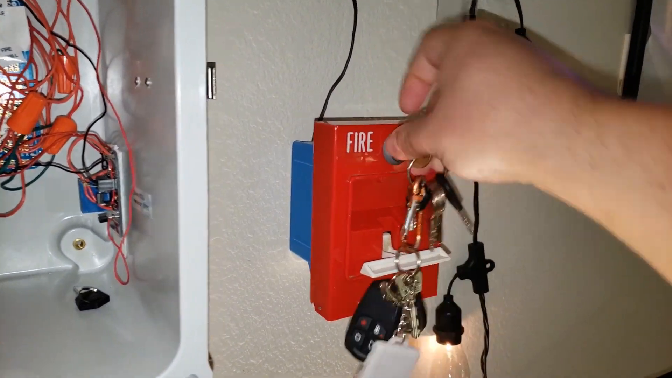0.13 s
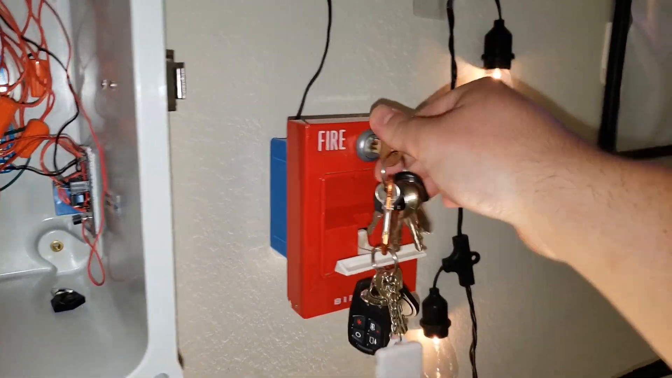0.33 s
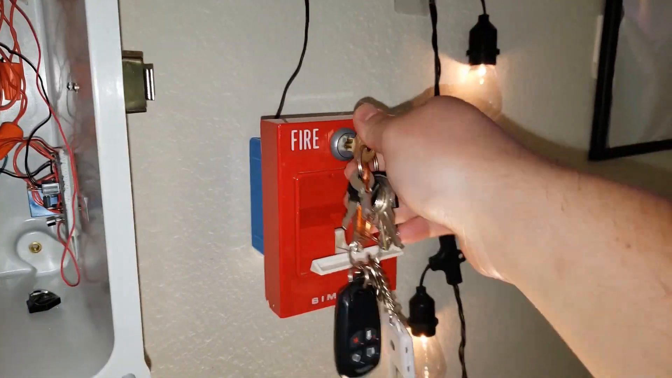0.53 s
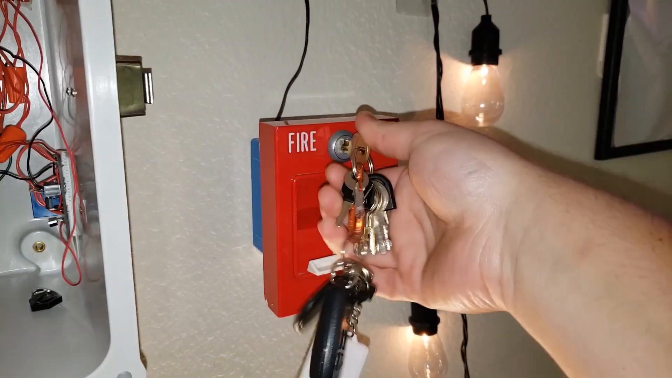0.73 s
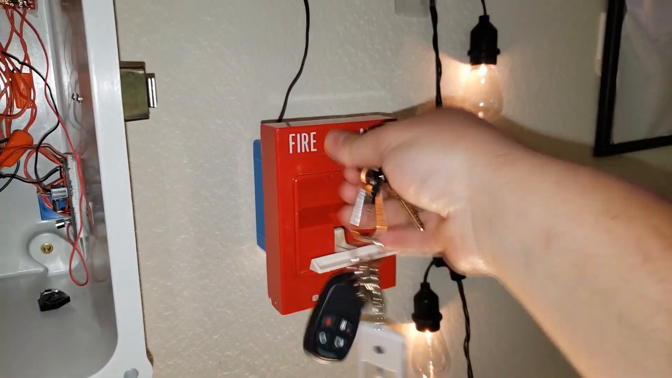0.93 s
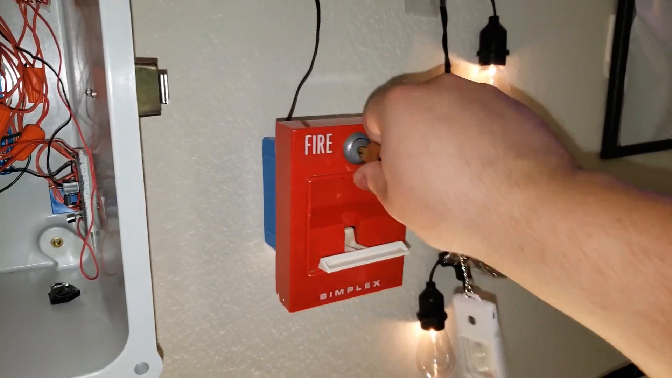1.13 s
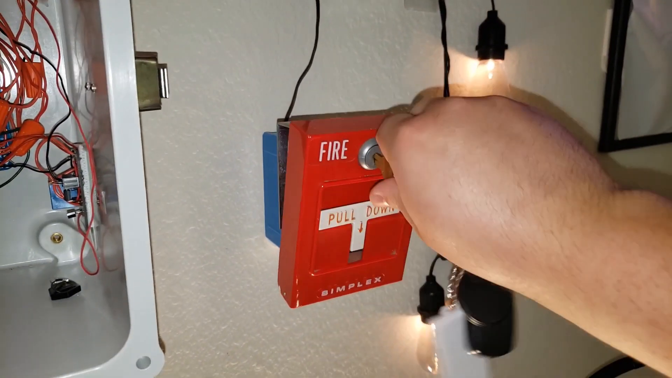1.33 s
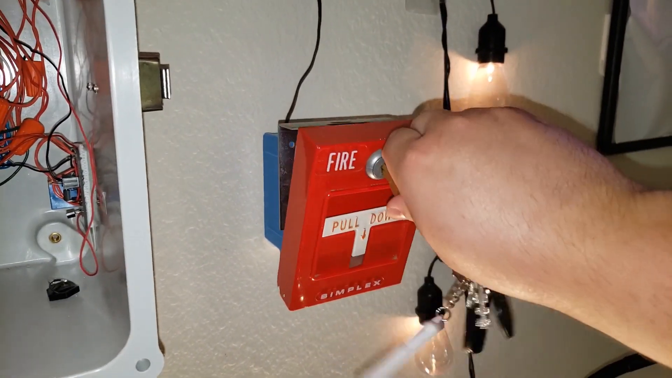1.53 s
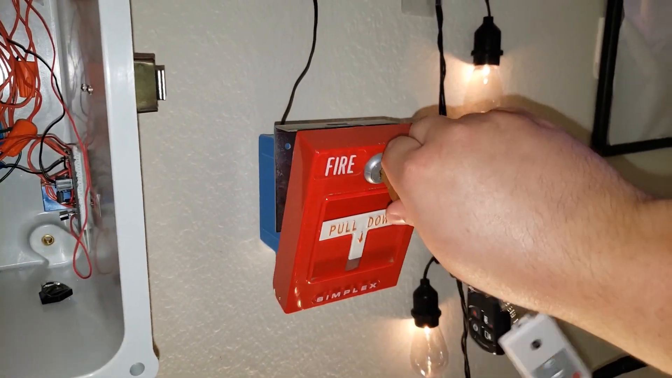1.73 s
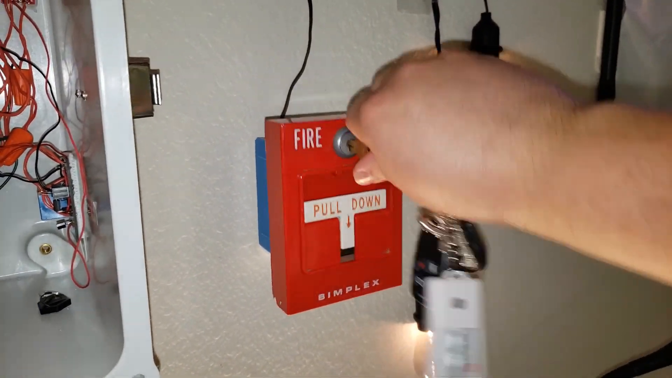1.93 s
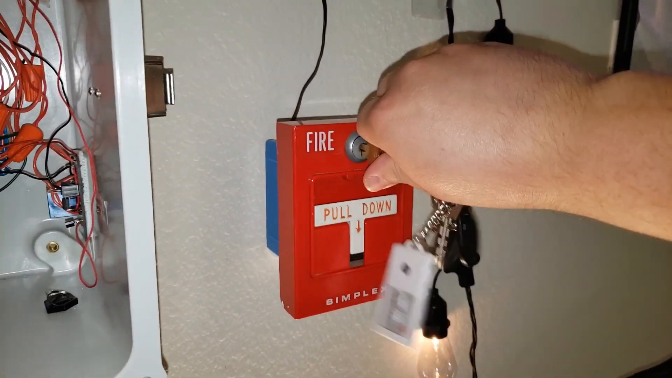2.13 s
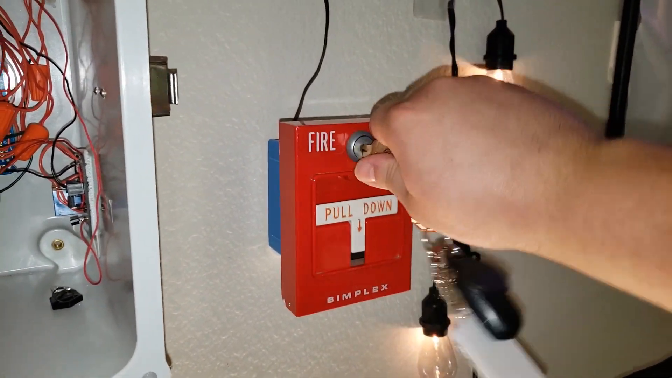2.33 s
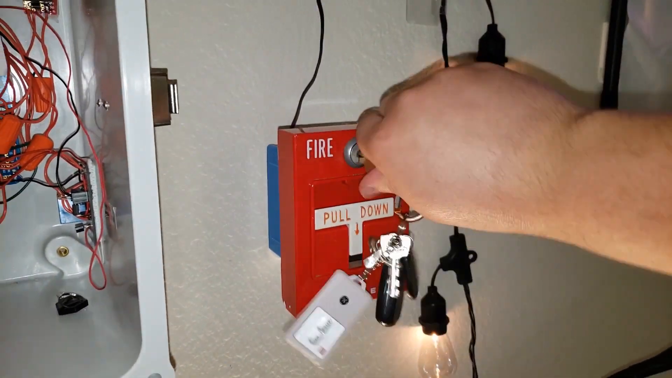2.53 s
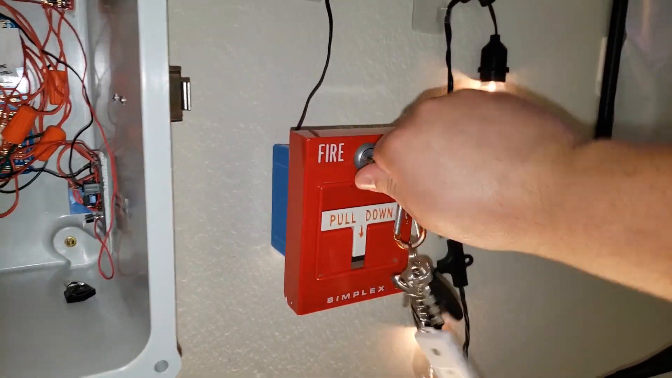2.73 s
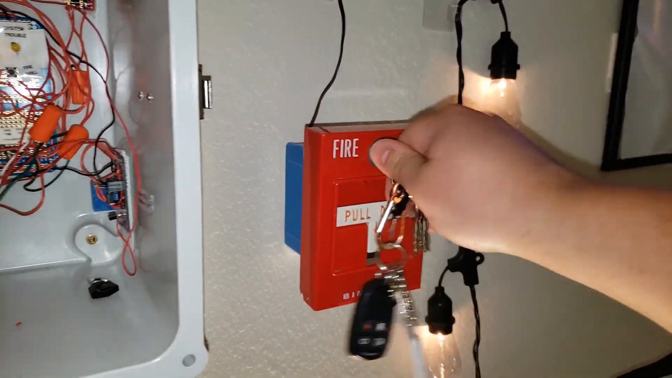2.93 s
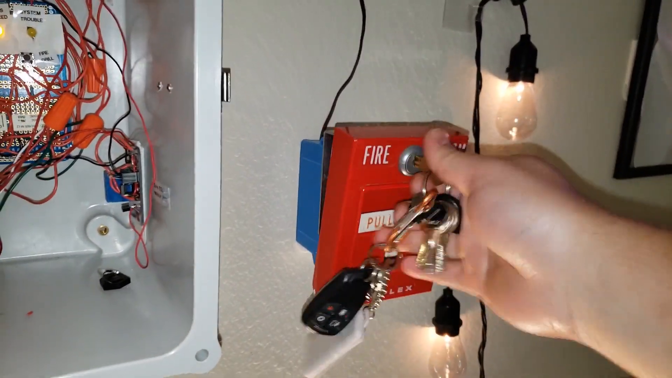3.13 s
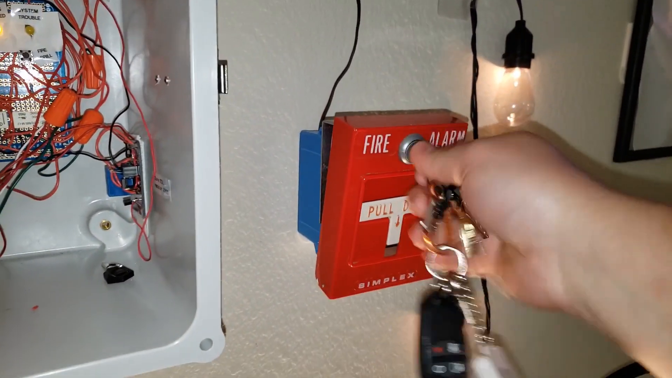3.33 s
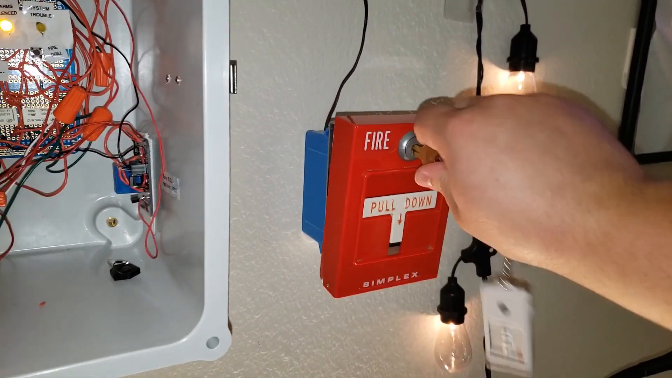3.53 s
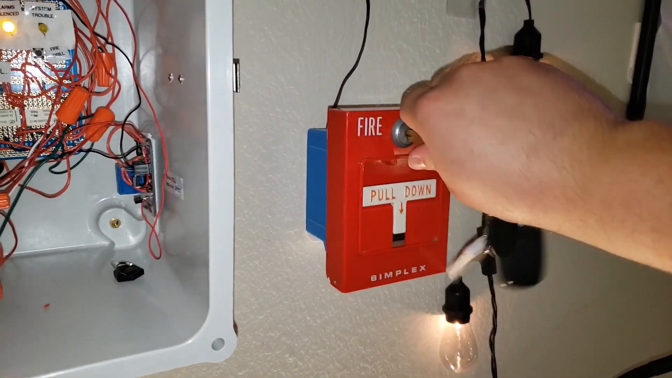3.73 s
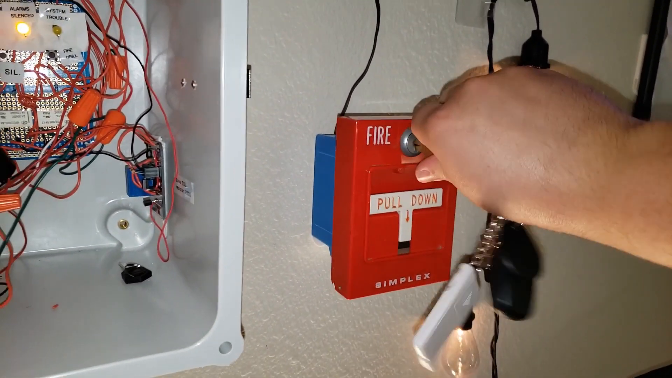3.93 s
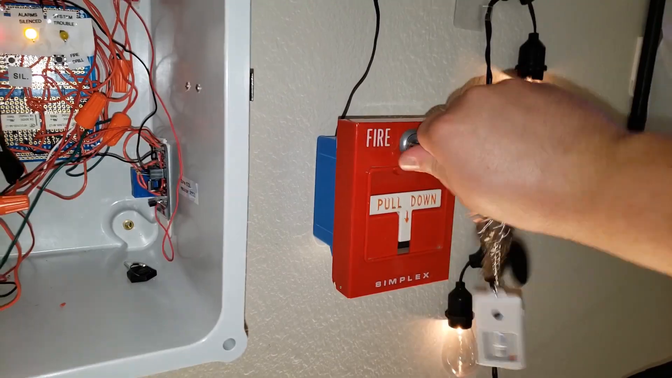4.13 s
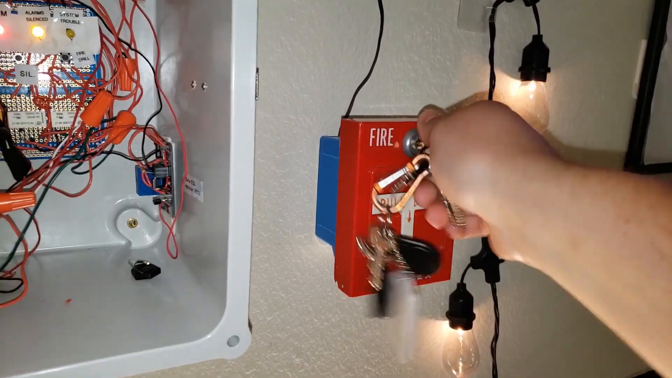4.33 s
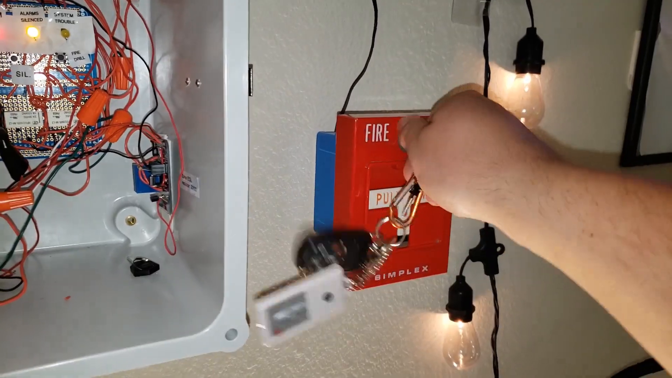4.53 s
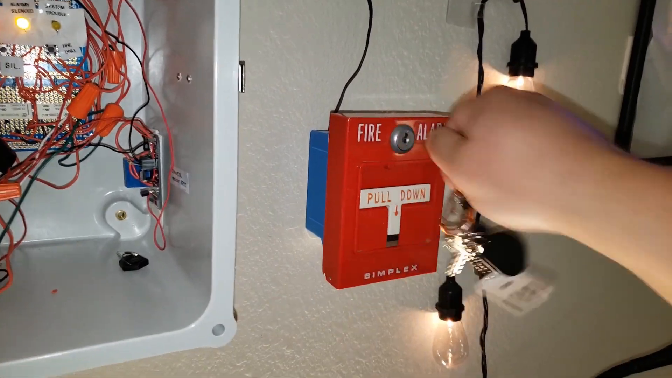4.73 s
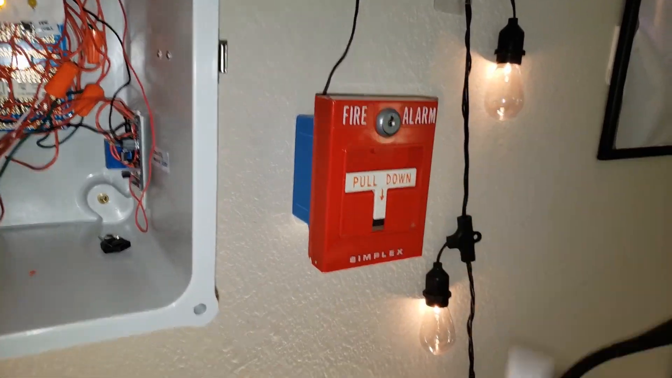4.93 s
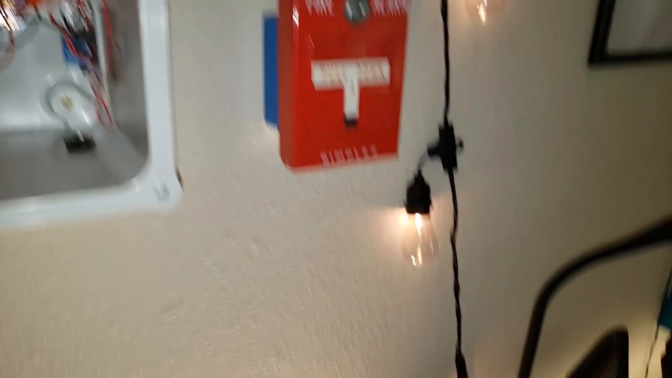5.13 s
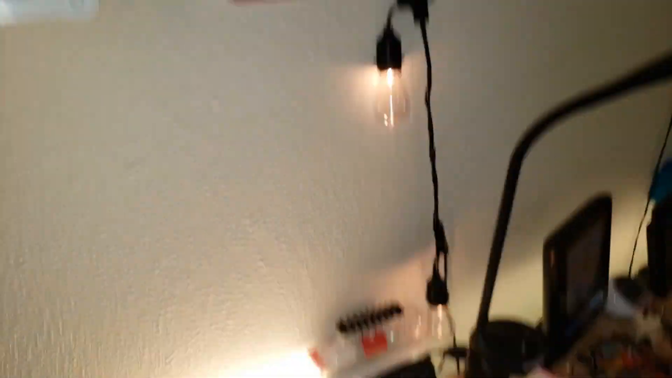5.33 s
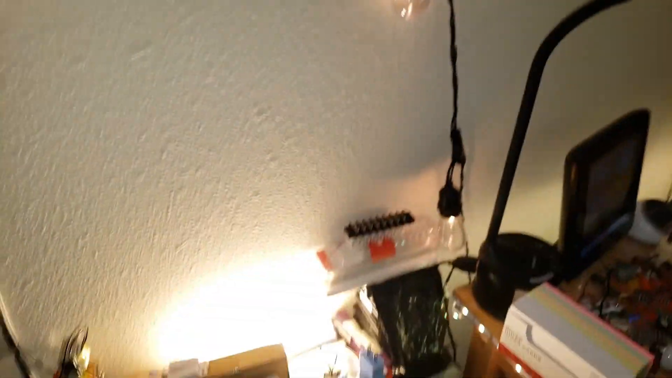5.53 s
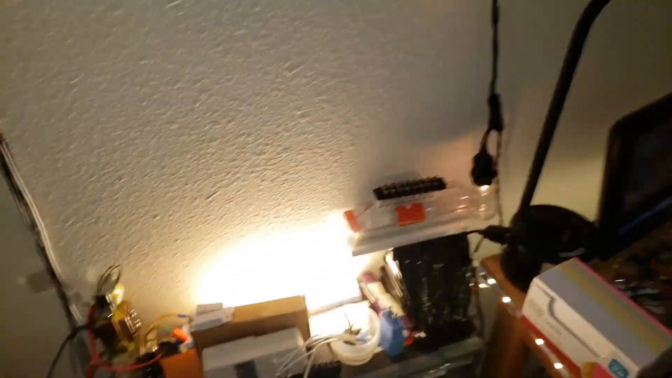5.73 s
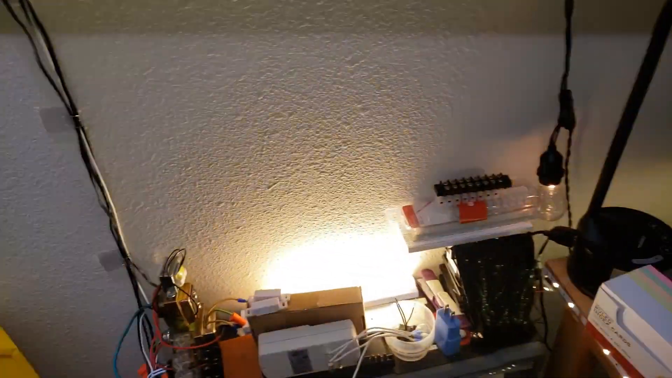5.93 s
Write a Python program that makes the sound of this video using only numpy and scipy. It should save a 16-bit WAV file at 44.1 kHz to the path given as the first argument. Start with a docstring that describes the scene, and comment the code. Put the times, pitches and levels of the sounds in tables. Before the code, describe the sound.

Keys jingle and knock against a hollow metal wall box as a lock turns and a lever snaps, then the bunch clatters onto a desk.

```python
"""A small room with a faint rumble; a bunch of keys hangs from the lock of a hollow wall box.
The key turns, the lever snaps up, the lid knocks, keys clink and a few ring on; at the end the bunch drops on a desk.
Each contact is a short burst of noise that makes casing, lock, keys, wall and box or desk ring.
Sliding noise, decaying tones, low rumble and a noise room tail complete it, heard through two microphones."""
import sys
import numpy as np
from scipy import signal
from scipy.fft import rfft, irfft, next_fast_len
from scipy.io import wavfile
from scipy.ndimage import uniform_filter1d

SR = 44100
rng = np.random.default_rng(int(sys.argv[2]) if len(sys.argv) > 2 else 0)


def transcribe(u):
    """Save the signal u as a 16-bit wav file named by the first command-line argument.

    u: samples, shape (n,) or (channels, n), limited to [-1, 1]; the rate is SR.
    q: integer samples, one column per channel.
    """
    v = np.clip(np.atleast_2d(u).T, -1, 1)
    q = np.round(v * 32767).astype(np.int16)
    wavfile.write(sys.argv[1], SR, q)


N = 268216

# knocks and clinks: start_s, casing level_db, hollowness_db, brightness_db, knock_hz
# levels are relative; hollowness (box) and brightness (keys) count from the casing level
HITS = [(.0741, -21, -22, -25, 575), (.1052, -29, -6, -16, 665), (.1424, -29.5, -9, -5.5, 680),
        (.1647, -28.5, -14.5, -21, 726), (.1982, -38, -33, -41.5, 696), (0.299, -51, -10, -1, 700),
        (.3125, -44, 0, 7.5, 710), (.3385, -43, -9.5, -14, 696), (.432, -66.5, -20, 6, 700),
        (.445, -67, -20, 7, 700), (.6165, -48, 6, -24, 750), (.6324, -51.5, -15, 6, 456),
        (.672, -41, -14, 10, 600), (.7112, -25, -14, -9, 664), (.728, -35, -17, 0, 610),
        (.7609, -31.5, -22, -2, 636), (.7948, -22, -12.5, -20, 670), (.855, -36, -19, -13, 690),
        (.8626, -41, -15, 6.5, 755), (.8948, -29, -8, -16.5, 755), (.9067, -52, -10, -29, 590),
        (.9487, -33, -0.5, -23, 610), (.9991, -27, -1, -25, 875), (1.0371, -33, -5, -22, 655),
        (1.056, -39, -12, -21.5, 750), (1.1644, -41, -21, -27, 415), (1.1716, -17.5, -9, -27.5, 750),
        (1.1977, -35, 5.5, -23, 750), (1.2049, -9, -17, -17.5, 830), (1.212, -11, -20, -5, 790),
        (1.2245, -10.5, -21, -27, 623), (1.2285, -14, -13, -2.5, 614), (1.365, -37.5, -28, -17, 725),
        (1.57, -69.5, -24.5, 14, 489), (1.6752, -42.5, -37, -7, 817), (1.6954, -40.5, -38.5, -14, 920),
        (1.728, -50.5, -35, -23.5, 967), (1.7825, -52.5, -34, -32.5, 740), (1.8633, -29.5, -6, -33, 875),
        (1.868, -21.5, -13.5, -23, 825), (1.9195, -21.5, -3.5, -6, 727), (1.9246, -15.5, -14, -32, 665),
        (2.0697, -16, -10, -21.5, 803), (2.1278, -33.5, -8.5, -10, 670), (2.2284, -43, -22, -8, 775),
        (2.283, -51.5, -4.5, -15, 667), (2.3525, -39.5, -19.5, -11.5, 937), (2.4025, -43, -24, -19, 554),
        (2.4972, -15.5, -12, -16.5, 692), (2.5212, -20, -7, -3.5, 835), (2.5465, -29.5, -12, -14, 573),
        (2.6449, -33, -4.5, -11, 635), (2.6497, -35.5, -9, 2, 620), (2.695, -36, -18, -15, 620),
        (2.7363, -47, -23, 4, 800), (2.7801, -36, -10, -17, 790), (2.833, -61, 1, 26, 615),
        (2.874, -46, 2, -22, 815), (2.893, -44.5, -8, -3.5, 660), (2.922, -44, -6.5, -3, 583),
        (2.9807, -72.5, -24, 26, 503), (3.0403, -20.5, -9.5, -11, 830), (3.0784, -32, -17, -5.5, 555),
        (3.159, -60.5, -2, 39, 999), (3.165, -35, -22, -25, 810), (3.171, -65, -34, 16, 756),
        (3.174, -58.5, -29, 28, 740), (3.272, -59.5, 2, 8, 770), (3.3152, -51.5, 6.5, -8, 750),
        (3.465, -38, -22, -21.5, 653), (3.5174, -33, -9.5, -39, 622), (3.6665, -46, -28, -22, 690),
        (3.6801, -16.5, -6.5, -5.5, 740), (3.6904, -14, -13.5, -49, 615), (3.7338, -29.5, -7, -9, 625),
        (3.741, -48.5, 8, -22, 614), (3.834, -34, -24, 1, 606), (3.8848, -27, -34, -14.5, 1040),
        (3.8936, -34.5, -33, -49, 999), (4.033, -65, 20.5, 0, 724), (4.0644, -29.5, -8, -22, 755),
        (4.087, -30, -19, -11.5, 740), (4.0922, -20.5, -20, -16, 745), (4.101, -34, 0.5, -9, 700),
        (4.125, -27.5, -4, -13, 654), (4.1878, -33.5, -16, -1, 727), (4.197, -34, -25.5, -15, 727),
        (4.2085, -9, -11.5, -21, 685), (4.242, -36, -18, -8.5, 694), (4.2615, -19, -8, -17.5, 690),
        (4.2784, -32, -2.5, -6, 750), (4.3149, -22, -26, -0.5, 977), (4.4345, -27.5, -2.5, -36.5, 694),
        (4.4692, -32, -21, -17, 725), (4.4885, -46, -17, 10.5, 283), (4.5251, -43.5, -26, -3, 738),
        (4.5516, -26, -31, -14, 902), (4.586, -31.5, -19, -4.5, 999), (4.6062, -28.5, -13, -4, 694),
        (4.6291, -28.5, -10, -1, 670), (4.6448, -31, -6, -3, 745), (4.652, -31.5, -21, -2, 710),
        (4.7007, -30, -23, -12, 690), (4.86, -82.5, -10, 30, 844), (4.9034, -62.5, -6, 19, 830),
        (4.9282, -62.5, -5, 22.5, 452), (4.912, -64.5, -20, 23, 497), (4.9631, -48, -17, 7, 520),
        (4.9958, -48, -39, 11, 430), (5.0682, -40.5, -45, 2.5, 890), (5.0963, -33, -55, -3, 886),
        (5.1127, -34.5, -35.5, -6, 990), (5.1736, -48.5, -23.5, 2.5, 483), (5.3674, -48, -47.5, 4.5, 820),
        (5.3828, -39, -43.5, 3.5, 770), (5.4145, -36.5, -52, -4.5, 980), (5.4745, -46.5, -37, -3, 455),
        (5.498, -60, -30, 5, 460), (5.5553, -47.5, -39, -3, 463), (5.5852, -32.5, -41, 0.5, 624),
        (5.6078, -37.5, -49, -6, 751), (5.658, -39, -35, -15, 450), (5.694, -48.5, -26, 8.5, 580),
        (5.7515, -25, -15.5, -15, 414), (5.7763, -44.5, 13.5, 9, 414), (5.7983, -26.5, -6.5, -5, 312),
        (5.809, -37.5, -4, -4, 600), (5.8362, -25.5, -8, -18, 290), (5.882, -23.5, -15, -27, 760),
        (5.9012, -23, -35, -27, 640), (5.9323, -25, -36, -9, 778), (6.0006, -27.5, -37, -13.5, 875),
        (6.0093, -32.5, -13, -3, 323), (6.0521, -9.5, -22.5, -20.5, 930), (6.0594, -20.5, -10, -10, 385),
        (6.0696, -12.5, -28, -12.5, 293)]
HIT_S, HIT_DB, HOLLOW_DB, BRIGHT_DB, KNOCK_HZ = np.transpose(HITS)

# fine rattle of the moving bunch: time_s, jingle_db, rub_db (rubbing on box or desk), relative levels
RATTLE = [(0, -30.5, -26), (.04, -43, -46), (.2, -74, -59), (.42, -71.5, -66), (.66, -67.5, -62),
          (.86, -52, -52), (1.07, -54, -64), (1.18, -80, -55), (1.3, -39.5, -59.5), (1.45, -59.5, -65.5),
          (1.7, -75.5, -104), (1.85, -78, -68.5), (2.0, -72, -53), (2.4, -64, -70), (2.7, -58.5, -66),
          (3.2, -60.5, -62.5), (3.6, -61, -67), (3.75, -48, -62), (4.02, -59, -63), (4.25, -43, -53.5),
          (4.62, -67.5, -58.5), (4.8, -61, -60.5), (4.95, -58.5, -73.5), (5.25, -63, -94.5),
          (5.42, -57, -73), (5.72, -70.5, -75), (5.78, -41.5, -38.5), (5.93, -32.5, -41),
          (6.08, -52.5, -58)]
RATTLE_S, JINGLE_DB, RUB_DB = np.transpose(RATTLE)

ON_DESK = np.arange(N) >= 5.74 * SR  # from this second the bunch hits the desk, not the box


def undb(db):
    """Turn decibels into a plain gain."""
    return 10 ** (np.asarray(db) / 20)


def pair(size, alike):
    """Left and right noise that are partly the same (alike: 0 unrelated, 1 identical)."""
    mid, side = rng.standard_normal((2, size))
    opposite = np.array([[1], [-1]])
    return np.sqrt((1 + alike) / 2) * mid + np.sqrt((1 - alike) / 2) * side * opposite


def grains(spread_db, size):
    """Gain that changes from grain to grain, a few much stronger than the rest; rms 1."""
    strength = np.minimum(rng.exponential(size=N // size + 1), 3.5)
    steps = np.repeat(strength, size)[:N]
    gain = undb(spread_db * uniform_filter1d(steps, size=size // 2))  # soften the edges
    return gain / np.sqrt(np.mean(gain ** 2))


def ring(x, hz, width):
    """One resonance, gain 1 at its centre."""
    return signal.lfilter(*signal.iirpeak(hz, hz / width, fs=SR), x)


def body(push, modes, hit_hz=1000., focus_db=0):
    """Contacts land in different places, so each mode gets a new share at each hit; unit gain for noise."""
    scatter_db = 3.0  # spread of a mode's share from hit to hit
    hit = np.searchsorted(HIT_S, np.arange(N) / SR + .002)  # new shares begin 2 ms ahead
    hit_rows = np.r_[0, :len(HITS)]  # one extra row for the time before the first hit
    hit_hz = np.broadcast_to(hit_hz, len(HITS))[hit_rows]
    focus_db = np.broadcast_to(focus_db, len(HITS))[hit_rows]  # loss per octave

    # modes far from the hit's pitch are driven less
    octaves = np.abs(np.log2(np.array(modes)[:, 0] / hit_hz[:, None]))
    luck_db = scatter_db * rng.standard_normal((len(HITS) + 1, len(modes)))
    share = undb(luck_db - focus_db[:, None] * octaves)
    weight = np.array([undb(2 * db) * np.pi * width / SR for _, width, db in modes])
    share /= np.sqrt(share ** 2 @ weight)[:, None]

    rung = 0
    for k, (hz, width, db) in enumerate(modes):
        sign = (-1) ** k
        rung = rung + sign * undb(db) * ring(push * share[hit, k], hz, width)
    # little is radiated outside the span of the modes
    edges = [modes[0][0] / 1.5, min(1.4 * modes[-1][0], 19000)]
    return signal.sosfilt(signal.butter(4, edges, "band", fs=SR, output="sos"), rung)


def contacts(hits, rattle_db, grain_db, hit_db, alike, tick, t60_s, onset_s):
    """Force on one body: each hit is a short noise burst with a rounded onset, a tick and a decay, over rattle."""
    t, noise = np.arange(N) / SR, pair(N, alike)
    force = undb(np.interp(t, RATTLE_S, rattle_db)) * grains(grain_db, size=64) * noise
    lead = int(4 * onset_s * SR)  # samples of onset before the tick
    hit_t = t[:int(.2 * SR)] - lead / SR
    for s, db in hits:
        i = max(int(s * SR) - lead, 0)
        shape = np.where(hit_t < 0, np.exp(hit_t / onset_s), undb(-60 * hit_t / t60_s))[:N - i]
        end = i + len(shape)
        energy = np.sum(shape ** 2)  # the same for every draw of noise
        burst = shape * noise[:, i:end]
        burst *= np.sqrt((1 - tick) * energy / np.sum(burst ** 2, axis=1, keepdims=True))
        burst[:, lead] += np.sqrt(tick * energy)  # the tick takes this share of the energy
        force[:, i:end] += undb(db + hit_db) * burst
    return force


def tones(s, modes, buzz=0.):
    """Decaying modes from one blow; loose parts make their phases wander, which sounds as a buzz."""
    out = np.zeros((2, N))
    start = int(s * SR)
    t = np.arange(min(N - start, SR // 2)) / SR
    attack = np.minimum(t / 0.00014, 1)
    for hz, db, t60 in modes:
        phase = rng.normal(0, 1.0, (2, 1))  # radians, separate for each microphone
        wander = uniform_filter1d(rng.standard_normal((2, len(t))), size=256) * 16
        wobble = wander * buzz * np.minimum(t / 0.018, 1)
        tone = np.sin(2 * np.pi * hz * t + phase + wobble)
        out[:, start:start + len(t)] += undb(db - 60 * t / t60) * tone * attack
    return out


def rumble():
    """Steady low rumble of the house: noise below 90 Hz, partly the same on both sides."""
    level_db, top_hz = -79, 90
    low = signal.sosfilt(signal.butter(2, top_hz, fs=SR, output="sos"), pair(N, 0.58))
    return undb(level_db) * low / low.std()


def room(x):
    """Diffuse reflections start after a few ms; each band of noise has its own level, decay and likeness."""
    # room tail: low_hz, high_hz, relative level_db, t60_s, left-right likeness (0 to 1)
    bands = [(25.2, 680, -4.5, 0.23, 1), (500, 2340, -8, 0.26, 0), (2130, 7300, -10.5, 0.42, 0),
             (6450, 21000, -9, 0.3, 0)]
    t = np.arange(int(.6 * SR)) / SR
    tail = 0
    for lo_hz, hi_hz, db, t60, alike in bands:
        band_pass = signal.butter(2, [lo_hz, hi_hz], "band", fs=SR, output="sos")
        band = signal.sosfilt(band_pass, pair(len(t), alike))
        fade = undb(-60 * t / t60) * np.clip((t - .0028) / 0.0025, 0, 1)
        tail = tail + undb(db) * band * fade / np.sqrt(np.sum(fade ** 2))
    return signal.fftconvolve(x, tail, axes=1)[:, :N]


def slide():
    """The key blade sticks and slips over the pins: grainy noise sets the barrel humming."""
    # sliding of the blade: time_s, relative level_db
    path = [(.36, -64.5), (.45, -64.5), (.6, -60), (.7, -62), (0.801, -61), (0.867, -40), (.93, -45),
            (1, -64.5), (1.058, -47), (1.119, -86.5)]
    # humming of the barrel: pitch_hz, width_hz, relative level_db
    barrel = [(470, 60, -3), (800, 80, -2), (1520, 90, -7), (1910, 80, -2), (2200, 100, -7)]
    s, db = np.transpose(path)
    level = undb(np.interp(np.arange(N) / SR, s, db, right=-200))
    return body(level * grains(2.8, size=256) * pair(N, 0.71), barrel)


def wall_thud():
    """Hollow knocks shake the wall, and the hand jolts the box against it; both ring low modes."""
    # low thud: pitch_hz, width_hz, relative level_db
    low_modes = [(48.6, 27, -1), (74.5, 72.6, -2), (134, 34, 1.5), (238.5, 62, -7.5)]
    # jolts of the box by the hand: start_s, relative level_db
    jolts = [(.0044, -30.5), (0.1043, -33), (1.1957, -39), (1.224, -39), (1.9175, -55), (2.4972, -53),
             (2.545, -53), (2.6501, -40), (3.0794, -53), (3.5194, -51.5), (3.6888, -39), (4.123, -40.5),
             (4.2096, -58), (4.4325, -42.5), (4.6282, -38.5), (4.6468, -38)]
    wall_db = -11.5  # hit strength set against the hollow knock
    knocks = contacts(zip(HIT_S, HIT_DB + HOLLOW_DB + wall_db), RUB_DB - 6.0, grain_db=4.0, hit_db=6.5,
                      alike=0.94, tick=.7, t60_s=0.021, onset_s=.0007)
    knocks *= np.where(ON_DESK, undb(-8.0), 1)  # the desk stands off the wall
    bare_jolts = contacts(jolts, RUB_DB - 200, grain_db=0, hit_db=8.5,  # -200: no rattle
                          alike=0.9, tick=.9, t60_s=0.017, onset_s=.0006)
    return body(knocks, low_modes) + body(bare_jolts, low_modes)


def hollow_knock():
    """The hollow box, later the desk top, rings near the pitch of each knock."""
    # hollow box: pitch_hz, width_hz, relative level_db
    box = [(345.7, 110, 8), (465.6, 220, -5), (613, 101, 1.5), (696, 126, -2.5), (743, 66, 1.5),
           (855, 220, -14)]
    # desk top: pitch_hz, width_hz, relative level_db
    desk = [(323, 47, 0.9), (440, 36, 0.8), (587, 83, -1), (870, 430, -6.5)]
    knock = contacts(zip(HIT_S, HIT_DB + HOLLOW_DB), RUB_DB, grain_db=1.5, hit_db=4.5,
                     alike=0.87, tick=0.32, t60_s=0.05, onset_s=0.001)
    on_box = body(knock * ~ON_DESK, box, KNOCK_HZ, focus_db=21.5)
    return on_box + body(knock * ON_DESK, desk, KNOCK_HZ, focus_db=3.5)


def casing_knock():
    """Every contact rings the broad middle resonances of the casing."""
    # casing: pitch_hz, width_hz, relative level_db
    casing = [(1115, 650, -11.5), (1553, 200, -1.5), (1826, 153, -1.5), (2282, 370, -0.5), (2644, 395, 1),
              (3010, 400, -5)]
    force = contacts(zip(HIT_S, HIT_DB), JINGLE_DB, grain_db=2.0, hit_db=-2.5,
                     alike=0.42, tick=0.074, t60_s=0.042, onset_s=0.00074)
    return body(force, casing)


def lock_rattle():
    """Contacts ring the lock barrel, more strongly when the hit is bright."""
    # lock barrel: pitch_hz, width_hz, relative level_db
    lock = [(3280, 1400, -1), (4014, 710, 1), (4450, 160, 1.5), (4890, 140, 1.5), (5730, 780, -4.5)]
    follows = 0.55  # dB of lock per dB of brightness
    force = contacts(zip(HIT_S, HIT_DB + follows * BRIGHT_DB), JINGLE_DB - 2.5, grain_db=5.0, hit_db=1.93,
                     alike=0.067, tick=0.046, t60_s=0.058, onset_s=0.00079)
    return body(force, lock)


def lever_snap():
    """The lever's spring snap rings the steel frame with a buzz."""
    # snaps: start_s, relative level_db
    snaps = [(1.207, -13.5), (1.228, -13)]
    # steel frame: pitch_hz, relative level_db, t60_s
    frame = [(2420, -8, 0.11), (2860, -3.5, 0.021), (3960, -8, 0.16), (4150, -12.5, 0.14), (4250, -6, 0.18),
             (4430, -4.5, 0.13), (4460, -5, 0.12), (4930, -10, 0.13), (6020, 4.5, 0.019)]
    return sum(undb(db) * tones(s, frame, buzz=1.5) for s, db in snaps)


def ringing_keys():
    """Single keys are struck so that one mode sings; close pairs beat."""
    # singing keys: start_s, pitch_hz, relative level_db, t60_s
    pings = [(0.929, 12700, -26.5, 0.09), (.927, 12650, -35, 0.1), (2.651, 6640, -9, 0.04),
             (2.651, 6210, -19, 0.017), (2.652, 6700, -27, 0.13), (3.35, 6950, -51, 0.24),
             (4.86, 13200, -54.5, .08), (4.901, 13760, -37.5, 0.054)]
    return sum(tones(s, [(hz, db, t60)], buzz=.3) for s, hz, db, t60 in pings)


def key_clinks():
    """Keys clink in their high modes; those brighter than the casing lean towards the top ones."""
    # keys: pitch_hz, width_hz, relative level_db
    key_modes = [(6260, 210, -13.5), (6360, 870, 1.5), (8290, 730, 2.5), (8740, 890, 3.5),
                 (10460, 1800, -3), (12276, 550, 2), (14400, 720, -0.5), (15400, 690, -5.5)]
    clink_hz, clink_tilt = 15000, 0.44  # tilt: dB per octave for each dB of brightness above 0
    force = contacts(zip(HIT_S, HIT_DB + BRIGHT_DB), JINGLE_DB - 4.0, grain_db=3.5, hit_db=3.5,
                     alike=0.39, tick=0.17, t60_s=0.053, onset_s=0.00072)
    return body(force, key_modes, clink_hz, clink_tilt * np.maximum(BRIGHT_DB, 0))


def keys_and_box():
    """Everything the keys, lock, box, wall and desk give off, added up."""
    low = wall_thud() + hollow_knock()
    metal = casing_knock() + lock_rattle() + key_clinks()
    return low + metal + ringing_keys() + lever_snap() + slide()


def scene():
    """Sound and room tail share one left-right lean, before the microphones tilt it by pitch; plus rumble."""
    lean_db = 4  # left minus right
    near = keys_and_box() * undb(np.array([[lean_db], [-lean_db]]) / 2)
    return near + room(near) + rumble()


def record(dry):
    """Two microphones of unlike colour, a short way apart; loud peaks are rounded and the top is cut."""
    # tilt between the microphones: pitch_hz, left minus right level_db
    ports = np.array([(60, -2), (250, -5.5), (500, -7), (1000, -5), (2000, 3.5), (4000, -0.5), (8000, -5.5),
                      (13000, -10)])
    lag_s, top_hz = .00003, 16000  # the left is later by lag_s
    size = next_fast_len(N)
    hz = np.arange(size // 2 + 1) * SR / size + 1  # +1 keeps the logarithm finite
    tilt_db = np.interp(np.log(hz), np.log(ports[:, 0]), ports[:, 1]) / 2
    port = undb(tilt_db) * np.exp(-1j * np.pi * hz * lag_s)  # half the tilt and lag on each side
    out = irfft(rfft(dry, size) * np.array([port, 1 / port]), size)[:, :N]
    top_cut = signal.ellip(10, .2, 90, top_hz, fs=SR, output="sos")
    return signal.sosfilt(top_cut, np.tanh(out))


dry = scene()
out = record(dry)
transcribe(out)
```